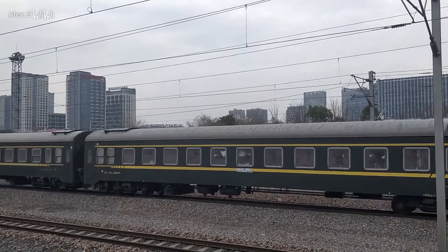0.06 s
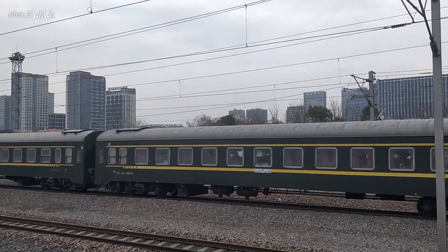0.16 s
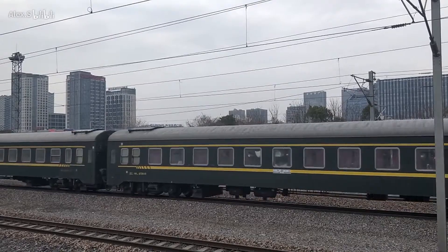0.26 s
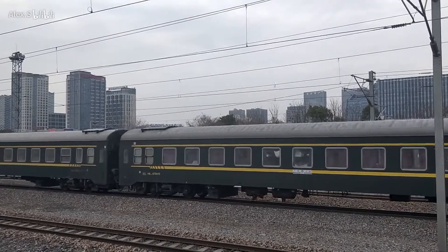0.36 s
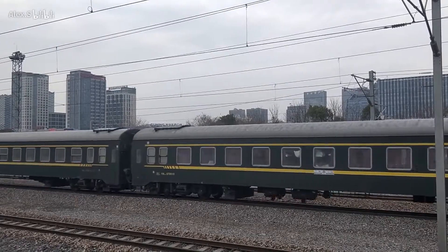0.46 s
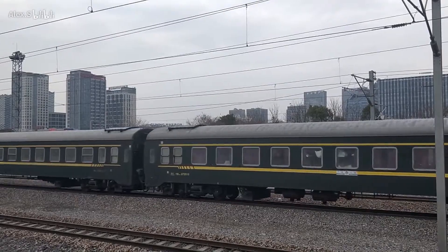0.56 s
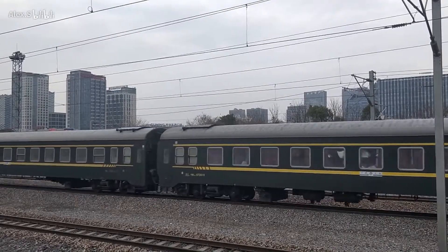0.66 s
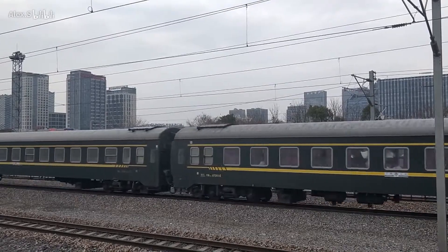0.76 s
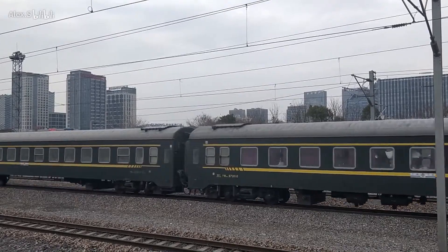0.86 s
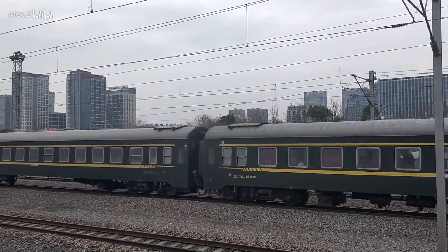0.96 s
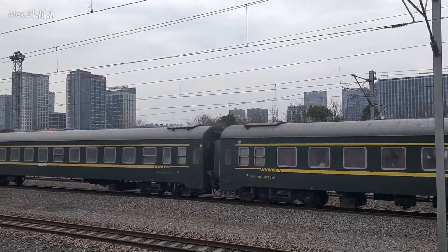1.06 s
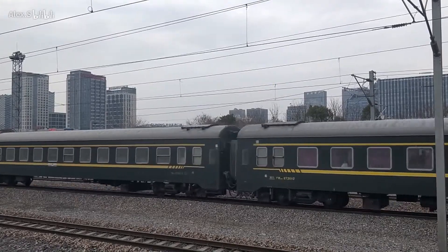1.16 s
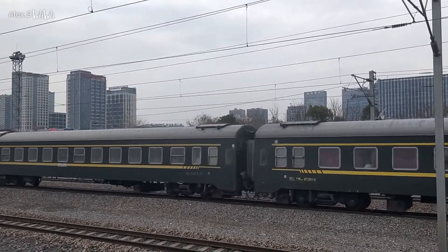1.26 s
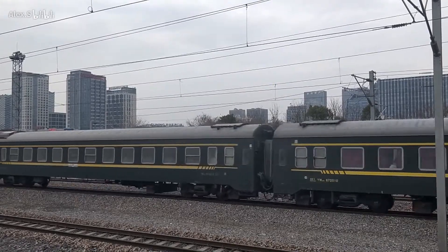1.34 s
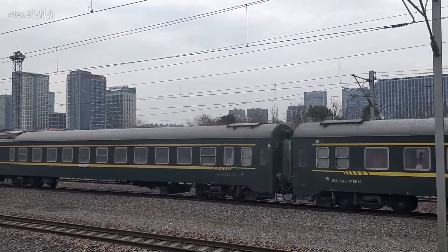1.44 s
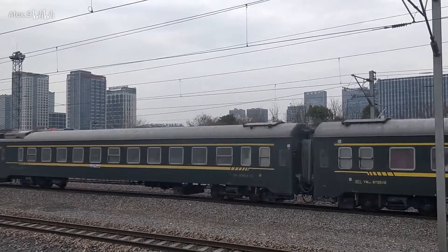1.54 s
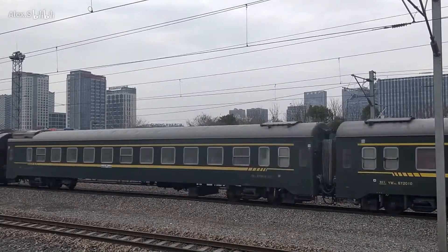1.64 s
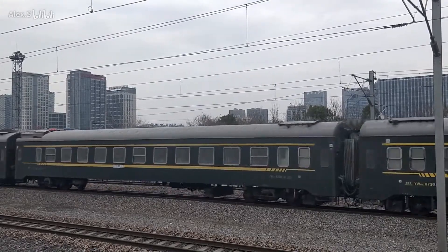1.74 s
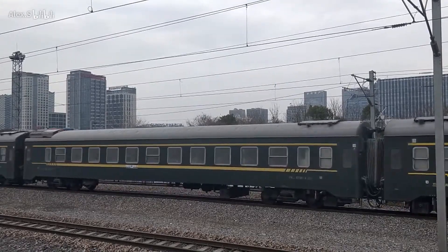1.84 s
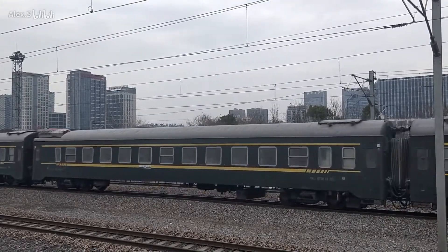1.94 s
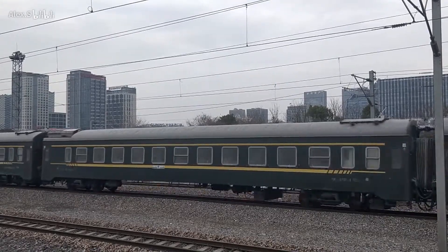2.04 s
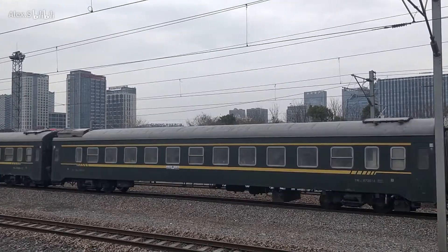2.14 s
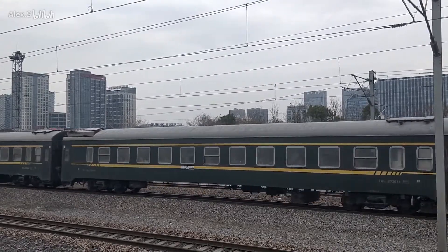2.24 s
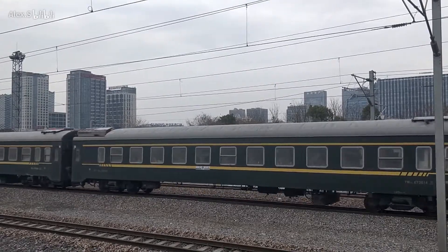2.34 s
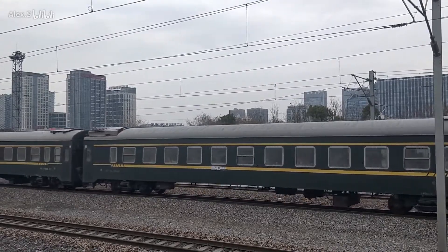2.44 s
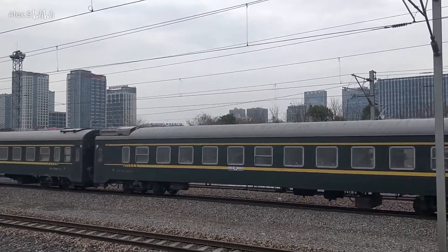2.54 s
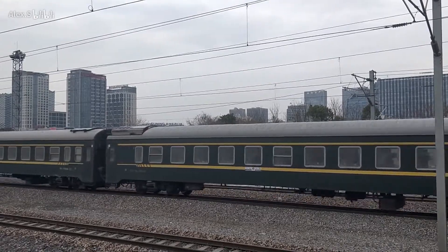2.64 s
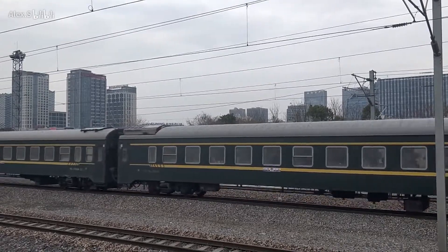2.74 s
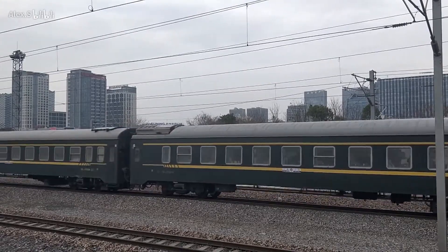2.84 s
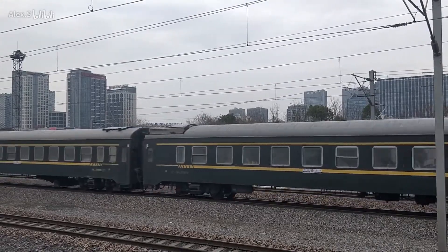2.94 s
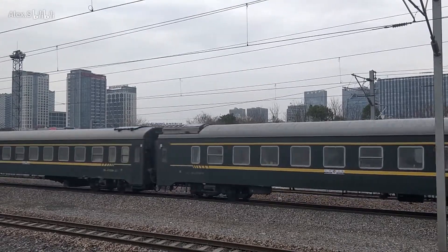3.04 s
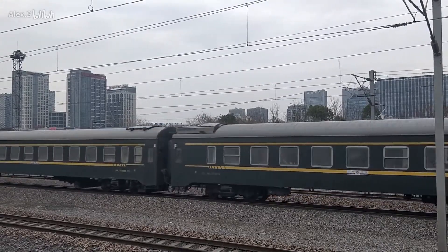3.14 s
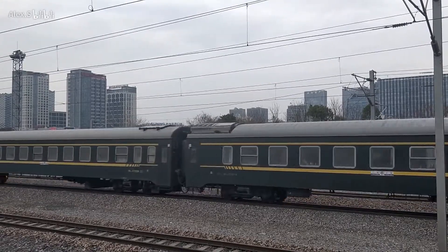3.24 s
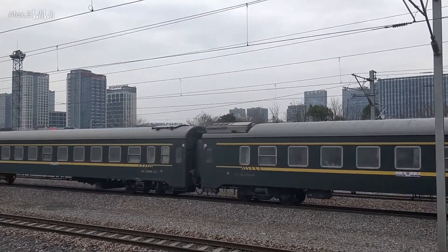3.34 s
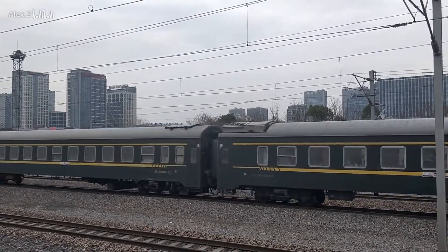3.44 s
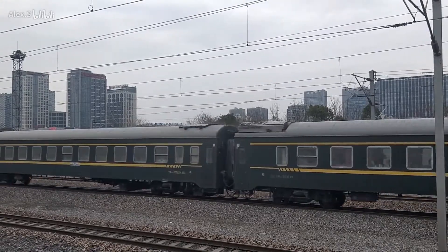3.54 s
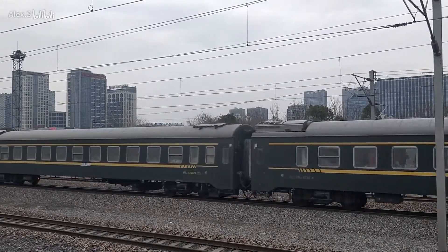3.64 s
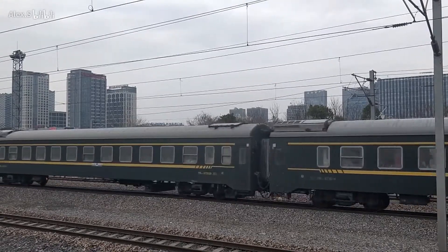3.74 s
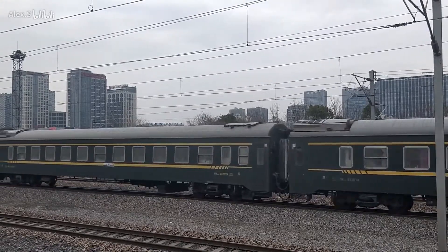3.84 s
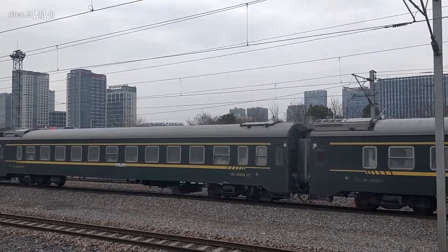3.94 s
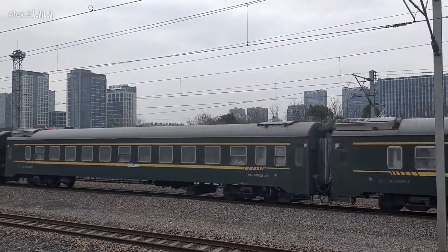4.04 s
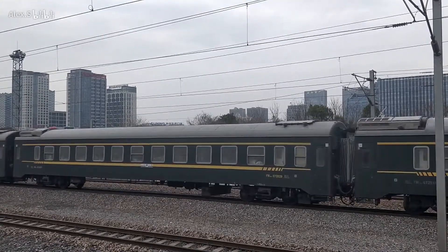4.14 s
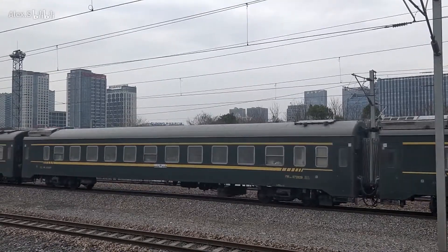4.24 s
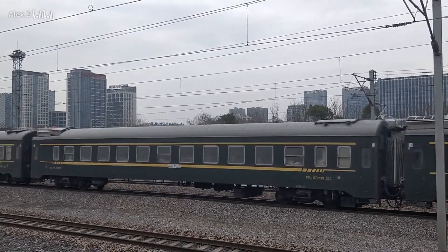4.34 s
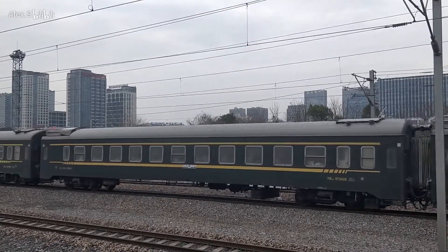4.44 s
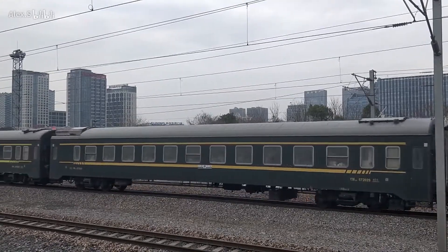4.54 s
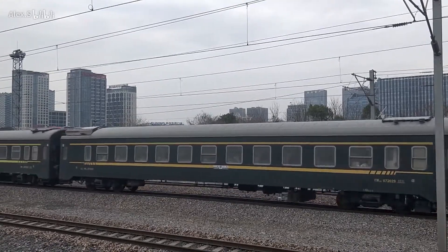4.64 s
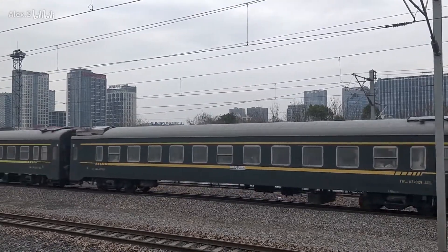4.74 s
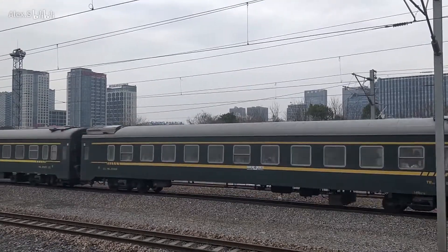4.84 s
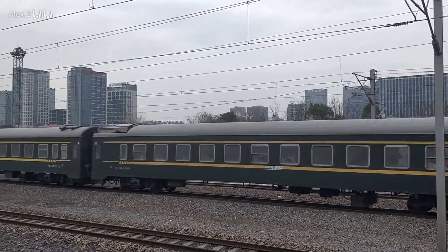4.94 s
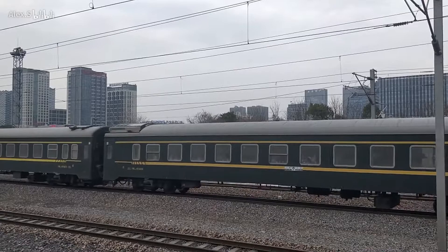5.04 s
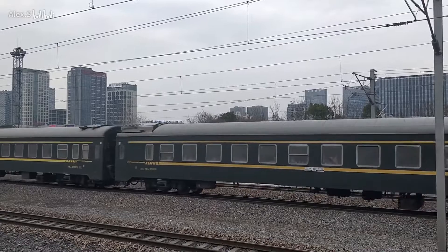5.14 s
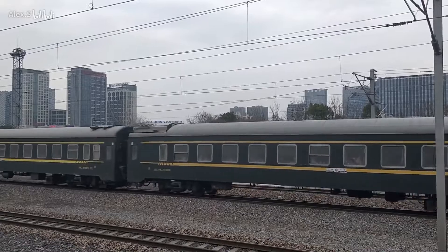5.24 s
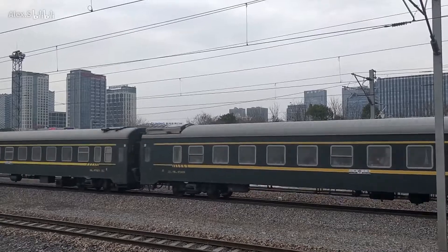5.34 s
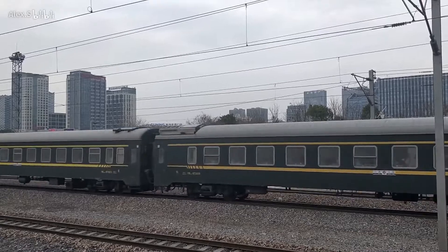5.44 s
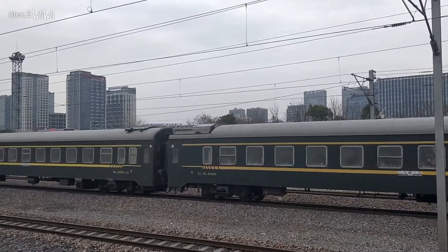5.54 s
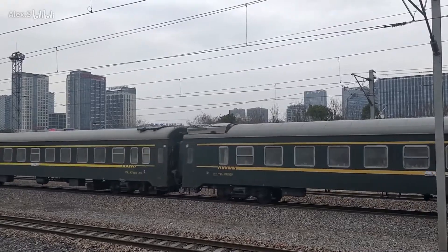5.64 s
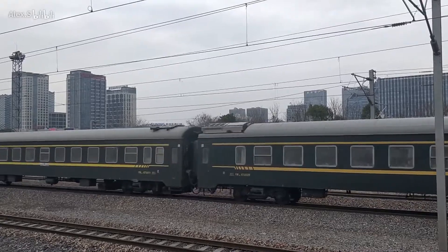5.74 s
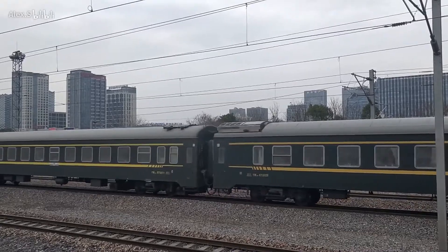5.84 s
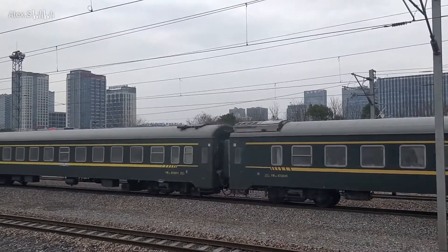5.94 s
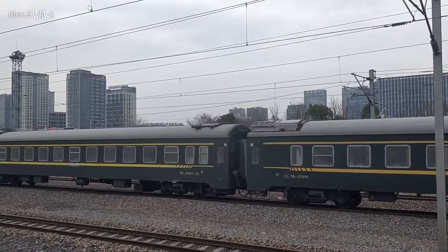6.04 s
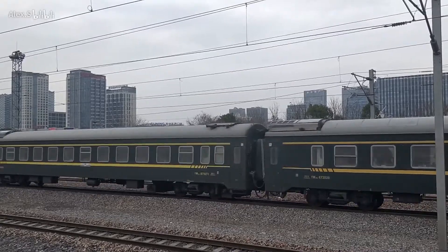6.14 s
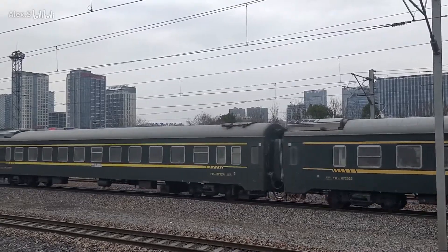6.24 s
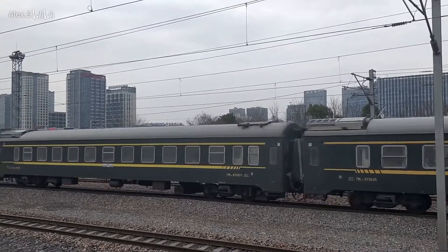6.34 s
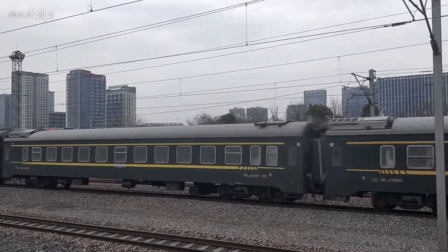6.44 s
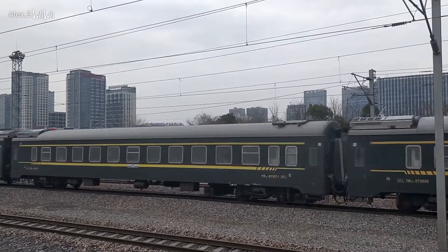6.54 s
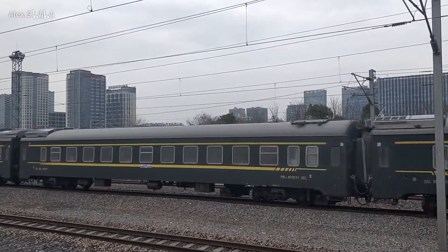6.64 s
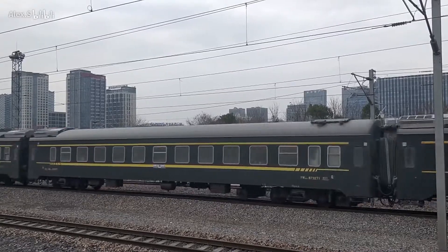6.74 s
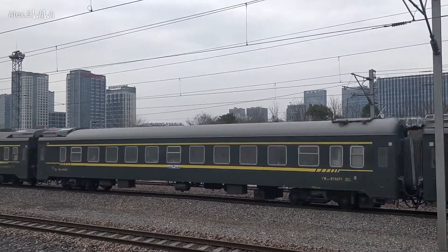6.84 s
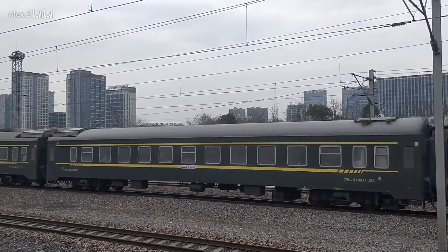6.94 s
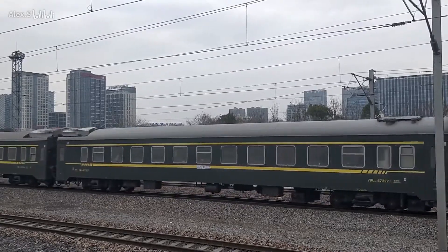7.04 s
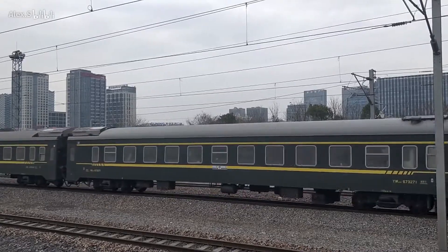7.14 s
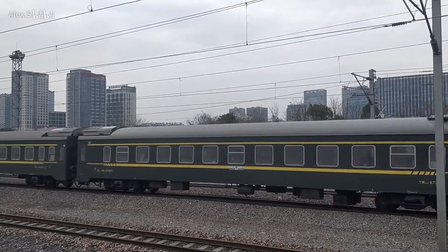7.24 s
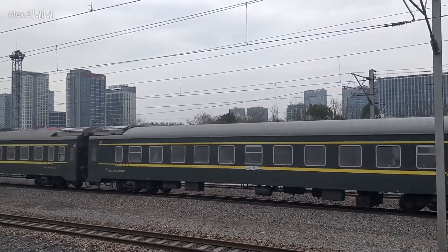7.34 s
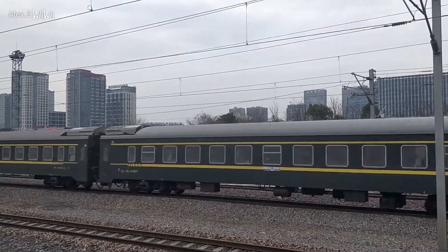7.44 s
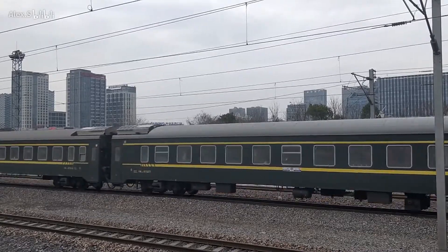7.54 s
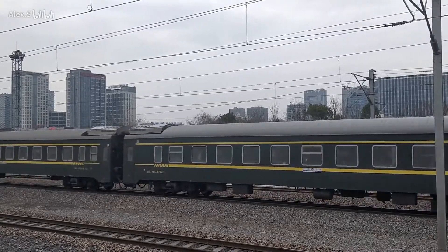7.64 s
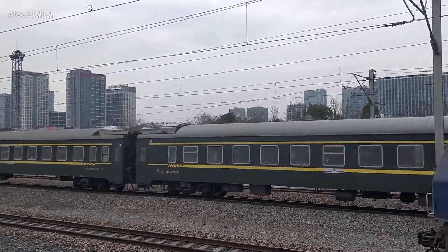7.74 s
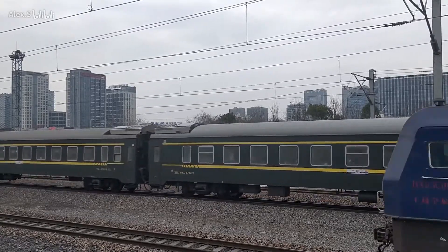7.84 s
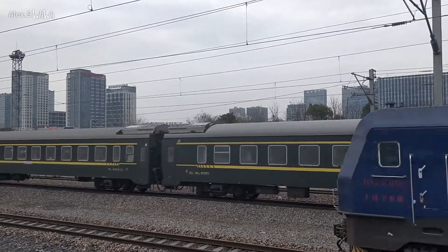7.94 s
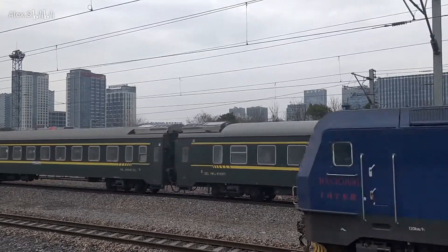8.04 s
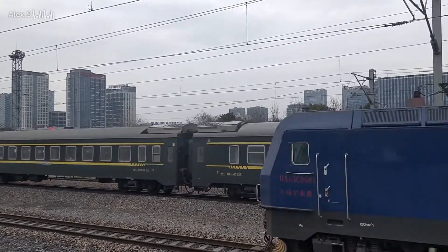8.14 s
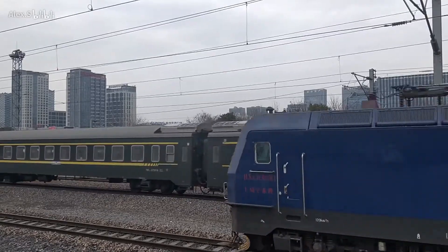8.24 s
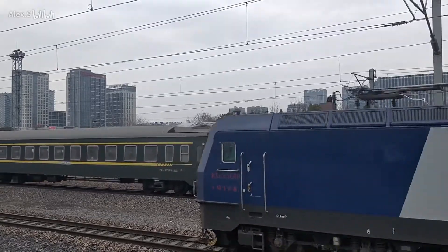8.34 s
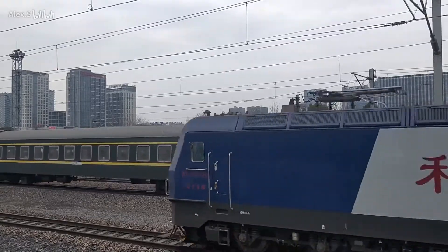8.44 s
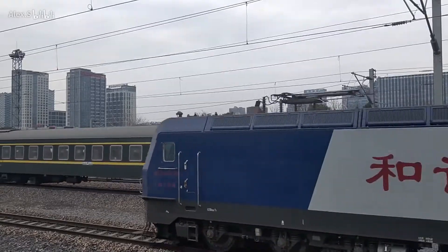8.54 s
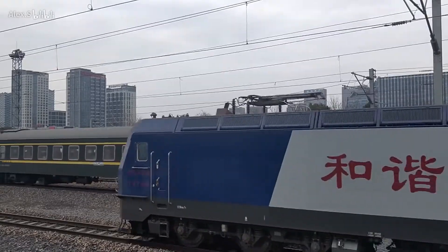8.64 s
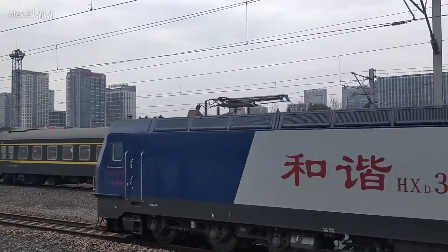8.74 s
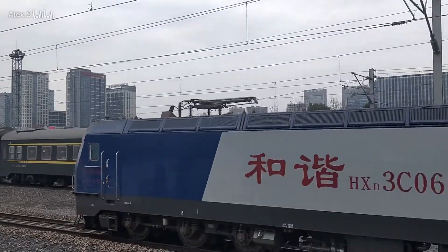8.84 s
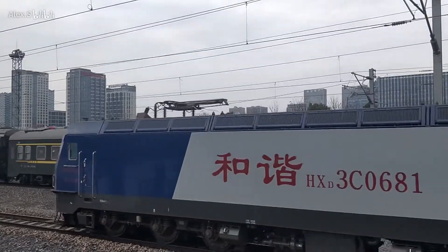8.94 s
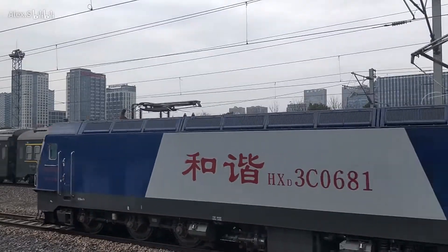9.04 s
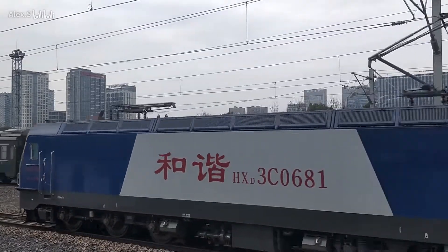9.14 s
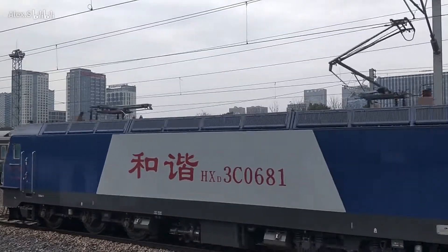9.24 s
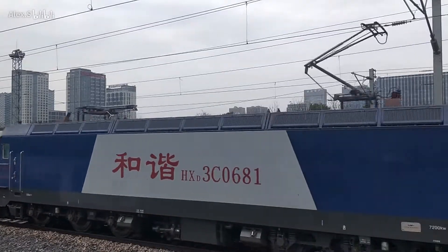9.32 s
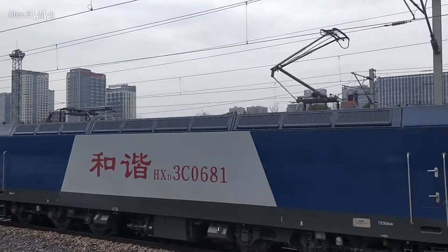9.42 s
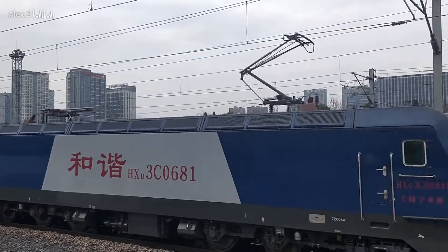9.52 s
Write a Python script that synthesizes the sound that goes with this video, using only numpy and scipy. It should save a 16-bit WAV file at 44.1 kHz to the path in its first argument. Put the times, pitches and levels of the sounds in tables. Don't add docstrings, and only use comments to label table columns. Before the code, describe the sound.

Passenger coaches roll past with a steady broadband roar while an electric locomotive approaches on the nearer track, its fan roar and wavering blower whine swelling.

```python
import sys
import numpy as np
from scipy import signal
from scipy.fft import rfft, irfft, dct, next_fast_len
from scipy.io import wavfile
from scipy.ndimage import uniform_filter1d

SR = 44100
rng = np.random.default_rng(int(sys.argv[2]) if len(sys.argv) > 2 else 0)


def inscribe(sig):
    pcm = np.round(np.clip(np.atleast_2d(sig).T, -1, 1) * 32767)
    wavfile.write(sys.argv[1], SR, pcm.astype(np.int16))


N = 422456
T = np.arange(N) / SR
SIZE = next_fast_len(N + 2)
HZ = np.maximum(np.arange(SIZE // 2 + 1) * SR / SIZE, 1)


def undb(db):
    return 10 ** (np.asarray(db) / 20)


def curves(table):
    s, *columns = np.transpose(table)
    return [np.interp(T, s, column) for column in columns]


def over_hz(table):
    hz, value = np.transpose(table)
    return np.interp(np.log(HZ), np.log(np.maximum(hz, 1)), value)


def wave(spectra):
    return irfft(spectra, SIZE)[..., :N]


def unit(x):
    return x / np.sqrt(np.mean(x.mean(axis=0) ** 2))


def walk(rate):
    hold = int(SR / rate)
    held = np.repeat(rng.standard_normal(N // hold + 1), hold)
    return 1.343 * uniform_filter1d(uniform_filter1d(held, hold), hold)[:N]


def plateaus(start, length, height, edge):
    t = T[::128, None]
    rises = np.tanh((t - start) / edge)
    falls = np.tanh((t - start - length) / edge)
    return np.interp(T, t[:, 0], ((rises - falls) / 2 * height).sum(axis=1))


def slide(x, ratio):
    at = np.cumsum(ratio) % (N - 1)
    return np.array([np.interp(at, np.arange(N), channel) for channel in x])


def roar(colour, rings, alike, lag_ms):
    # [f/Hz, left minus right/dB]
    port_tilt = [(30, 1.5), (200, 2.5), (340, 1), (600, 1.6), (1050, -0.5), (1870, -2), (2600, -6.5),
                 (3500, 1), (5900, -3.5), (8000, -4)]
    db = over_hz(colour)
    for hz, width, ring_db in rings:
        db = db + ring_db / (1 + (2 * (HZ - hz) / width) ** 4)
    mid, side = rfft(rng.standard_normal((2, SIZE)))
    likeness = np.clip(over_hz(alike), 0, 1)
    pair = np.sqrt(1 + likeness) * mid + np.sqrt(1 - likeness) * side * np.array([[1], [-1]])
    pair[0] *= np.exp(-2j * np.pi * HZ * lag_ms / 1000)
    return pair * undb(db + over_hz(port_tilt) * np.array([[.5], [-.5]]))


def bands(spectra):
    crossovers = [105, 700, 2400]
    above = [np.ones_like(HZ)]
    above += [1 / (1 + (hz / HZ) ** 10) for hz in crossovers]
    above += [0 * HZ]
    return [unit(wave(spectra * np.sqrt(np.abs(a - b)))) for a, b in zip(above, above[1:])]


def coaches():
    # [f/Hz, level/dB per Hz]
    coach_colour = [(21, -44.5), (35, -12), (96, -5), (134, -8.5), (157, -2.5), (291, -5.5), (339, -6),
                    (379, -7), (819, -11), (1620, -7.5), (2210, -21), (4190, -24.5), (6800, -34),
                    (8840, -64.5), (15000, -120)]
    # [f/Hz, width/Hz, level over the roar/dB]
    wheel_rings = [(162.2, 10, 4.5), (1541, 53, 5.5), (1664, 85, 4.5), (2043, 160, 8.5), (2517, 48, 7.5),
                   (2747, 66, 5), (3234, 37, 6.5), (3505, 54, 7.5), (4076, 190, 6.5), (4480, 300, 4),
                   (4740, 210, 5.5), (5080, 100, -4), (5460, 530, 5), (6376, 300, 4.5)]
    # [f/Hz, likeness/0-1]
    coach_alike = [(30, 0.7), (70, 0.99), (250, 1), (500, 1), (800, 0.08), (1250, 0.74), (1600, 0.37),
                   (1900, 0.8), (2500, 0), (5000, 0.3)]
    range_levels = [-42.5, -32, -35, -39]
    shade_levels = [-2.5, 2.5, -9, 0.5]
    ranges = bands(roar(coach_colour, wheel_rings, coach_alike, lag_ms=0.394))
    wheelsets = 1 + .012 * walk(5)
    shade = plateaus(7.06, T[-1], 1, edge=1)
    return [undb(db + shade_db * shade) * slide(x, wheelsets)
            for x, db, shade_db in zip(ranges, range_levels, shade_levels)]


def locomotive(loss_db, hz):
    # [f/Hz, level/dB per Hz]
    loco_colour = [(21, -50), (35, -22.5), (86, -26.5), (212, 0.5), (318, -1), (522, -2.5), (683, -11.5),
                   (895, -5.5), (1100, -9.5), (1800, -8.5), (2760, -33), (4840, -31.5), (7600, -52.5),
                   (9880, -88), (16700, -120)]
    # [f/Hz, width/Hz, level over the roar/dB]
    duct_rings = [(74.3, 14, 11.5), (277, 51, 0.5), (413.4, 9.1, 2.5), (1273, 54, 6.5), (1435, 39, 8),
                  (1762, 47, 5.5), (1876, 80, 4.5), (2108, 53, 5), (5100, 930, 3)]
    # [f/Hz, likeness/0-1]
    loco_alike = [(30, 1), (70, 0.97), (250, 0.92), (600, 0.76), (1000, .7), (1400, 0.64), (1800, 0.083),
                  (5000, 0.05)]
    range_levels = [-37.5, -19.5, -28, -27]
    loss_shares = [.25, .63, 1.05, 1.2]
    ranges = bands(roar(loco_colour, duct_rings, loco_alike, lag_ms=.27))
    doppler = hz / np.interp(8.9, T, hz)
    return [undb(db + share * loss_db) * slide(x, doppler)
            for x, db, share in zip(ranges, range_levels, loss_shares)]


def trains(loss_db, hz):
    # [t/s, length/s, rumble rise/dB]
    bogie_passes = [
        (0.102, .2, 1),
        (1.0, .7, 2),
        (1.9, 0.1, 4.5),
        (3.05, 0.28, 2.5),
        (4.1, 0.34, 4.5),
        (4.58, .2, 5.5),
        (5.18, 0.34, 4),
        (6.163, .14, 7),
        (9.246, 0.11, 2),
    ]
    ground_db = plateaus(*np.transpose(bogie_passes), edge=.05)
    out = 0
    for k, (far, near) in enumerate(zip(coaches(), locomotive(loss_db, hz))):
        out = out + undb((k == 0) * ground_db + .6 * walk(14)) * (far + near)
    return out


def air(loss_db):
    # [t/s, length/s, upper hiss rise/dB,
    # top hiss rise/dB]
    hiss_rows = [(.1, 0.11, 0, 11.5), (0.304, 0.11, 3, 11.5), (0.64, 1, -2, 10.5), (1.138, 0.082, 5, 4),
                 (1.36, 0.055, 5.5, 5.5), (1.686, 0.91, -1, 10), (1.9, 0.055, 8, 7.5),
                 (2.122, 0.09, 4.5, 8), (3.148, 1.17, 0.5, 10.5), (3.534, 0.078, 4.5, 3.5),
                 (3.763, 0.076, 2, 5.5), (4.456, 0.32, 5, 11), (4.952, .13, 1, 10),
                 (5.243, 0.14, 3.5, 11.5), (5.943, .08, 3, 17.5), (6.117, .26, 1.5, 12.5),
                 (6.744, 0.11, 4.5, 11), (6.948, 0.071, 6, 14), (7.057, 0.62, 3, -1), (7.65, 0.5, 2.5, 0),
                 (8.302, .25, 2.5, 11), (8.65, 0.063, 6, 19.5), (8.927, 0.2, 4.5, 14.5),
                 (9.191, 0.19, 4.5, 11.5), (9.499, .2, 5, 12.5)]
    start, length, upper_rise, top_rise = np.transpose(hiss_rows)
    upper_db = plateaus(start, length, upper_rise, edge=0.011)
    top_db = plateaus(start, length, top_rise, edge=0.011)
    noise = rfft(rng.standard_normal((3, SIZE)))
    upper = unit(wave(noise[:2] / (1 + ((HZ - 7300) / 900) ** 2)))
    top_colour = 1 / (1 + ((HZ - 10300) / 500) ** 2) + .55 / (1 + ((HZ - 9200) / 800) ** 2)
    top = unit(wave(noise[2:] * top_colour))
    upper *= undb(np.array([[-53.], [-54.5]]) + 0.33 * loss_db + 1.2 * upper_db + 1.4 * walk(11))
    top_db = top_db + .1 * loss_db + 1.6 * walk(25)
    return upper + top * undb(np.array([[-63.], [-95.]]) + top_db)


def knock():
    # [t/s, peak level/dB, f/Hz]
    stone = [
        (.352, -17, 1250),
    ]
    s, db, hz = stone[0]
    age = np.maximum(T - s, 0)
    ring = undb(db + 2.7) * np.exp(-age / .0026) * np.sin(2 * np.pi * hz * age)
    return np.array([ring, ring])


def tone(hz, waver):
    front = np.sin(2 * np.pi * np.cumsum(hz * (1 + waver * walk(14))) / SR)
    rear_hz = hz + .5 * (hz[0] - hz)
    rear = np.sin(2 * np.pi * np.cumsum(rear_hz * (1 + 1.51 * waver * walk(20))) / SR)
    return np.sqrt(2) * (front + undb(-10.5) * rear)


def swelling(rows):
    start, length, db = np.transpose(rows)
    flutter_db = 1.9 * walk(14)
    return plateaus(start, length, undb(db), edge=.03) * undb(flutter_db)


def lag_left(x, lag_ms):
    return np.array([np.interp(T - lag_ms / 1000, T, x[0]), x[1]])


def blowers(loss_db, hz, lag_ms):
    # [t/s, length/s, level/dB], four tables
    low = [
        (3.45, .85, -30),
        (4.6, .32, -28),
        (4.95, .33, -32),
        (5.4, .35, -30),
        (5.8, .4, -35),
        (6.35, .85, -25),
        (7.42, .42, -21),
        (7.95, .28, -26),
        (8.3, .7, -21),
        (9.12, .5, -31),
    ]
    second = [
        (3.0, .3, -38),
        (3.55, .4, -37),
        (6.1, .55, -28),
        (6.7, .55, -31),
        (7.33, .3, -29),
        (7.72, .5, -29),
        (8.25, .45, -29),
        (8.75, .5, -23),
        (9.3, .3, -27),
    ]
    third = [
        (4.0, .3, -35),
        (4.6, 1.1, -37),
        (5.8, .4, -34),
        (6.83, .35, -28),
        (7.23, .28, -23),
        (7.72, .5, -25),
        (8.52, .23, -23),
        (8.92, .33, -22),
        (9.32, .3, -31),
    ]
    highest = [
        (5.2, .6, -38),
        (6.2, .8, -40),
        (7.25, .25, -35),
        (7.6, .25, -33),
        (7.9, .25, -31),
        (8.22, .42, -28),
        (8.95, .35, -31),
        (9.33, .3, -33),
    ]
    ratios = [.2545, .409, .590, 1]
    wavers = [0.0037, 0.00759, 0.00344, 0.00393]
    trims = [-1.5, -1.5, -1, 2.5]
    between_levels = [-41, -35.5, -35.5, -44.5]
    # [t/s, length/s, hum level/dB]
    compressor_runs = [
        (5.9, 0.56, -32),
        (6.65, 1.13, -32.5),
        (8.0, .33, -28.5),
        (8.42, 0.36, -31),
        (9.05, 0.42, -35.5),
    ]
    gains = []
    for rows, trim_db, db in zip([low, second, third, highest], trims, between_levels):
        swell = undb(trim_db) * swelling(rows)
        between = undb(db + 0.53 * loss_db + 4.9 * walk(6))
        gains.append(np.hypot(swell, between))
    out = sum(gain * tone(ratio * hz, waver) for gain, ratio, waver in zip(gains, ratios, wavers))
    out += gains[3] * undb(-7.5 + 5.9 * walk(3.1)) * tone(2 * hz, .004)
    out += swelling(compressor_runs) * tone(.1515 * hz, 0.0022)
    return lag_left(out * undb([[.7], [-.7]]), lag_ms)


def side_fan():
    # [t/s, f/Hz, level/dB]
    grille = [
        (8.75, 450, -47),
        (8.95, 445.4, -24.5),
        (9.2, 435.4, -21),
        (9.4, 423.4, -28.5),
        (9.58, 415.4, -21.5),
    ]
    hz, db = curves(grille)
    return undb(db + 1.3 * walk(13)) * np.sin(2 * np.pi * np.cumsum(hz * (1 + 0.01197 * walk(22))) / SR)


def scene():
    # [t/s, level lost to distance/dB, top blower tone f/Hz, left port lag/ms]
    approach = [(0, -25.5, 926, 0.26), (3, -18.5, 928.7, 0.15), (4, -15, 924.6, 0.42),
                (5, -13.5, 918.3, 0.3), (6, -9, 920.5, 0.43), (6.6, -9.5, 917, 0.34),
                (7, -7.5, 913.6, 0.38), (7.5, -5.5, 911.2, 0.29), (8, -3.5, 904.8, 0.29),
                (8.5, -1, 896, 0.26), (9, -0.5, 887.7, 0.1), (9.58, -0.5, 887, 0.067)]
    loss_db, hz, lag_ms = curves(approach)
    return trains(loss_db, hz) + air(loss_db) + knock() + blowers(loss_db, hz, lag_ms) + side_fan()


def coarse(x, grid, finer_db, follow=.48):
    # [f/Hz, step/dB]
    step_table = [(2500, -41), (3800, -33.5), (5000, -30), (5700, -28.5), (8000, -29.5), (11000, -29.5)]
    frame = 1024
    kaiser = np.cumsum(np.kaiser(frame + 1, 4 * np.pi))
    rise = np.sqrt(kaiser[:-1] / kaiser[-1])
    half, lead = frame // 2, 2 * frame - grid
    pad = np.pad(x, ((0, 0), (lead, 3 * frame)), mode="reflect")
    seams = pad[:, :pad.shape[1] // frame * frame].reshape(2, -1, frame)
    a, b = seams[..., half - 1::-1], seams[..., half:]
    up, down = rise[half:], rise[half - 1::-1]
    head, tail = up * b - down * a, up * a + down * b
    c = dct(np.concatenate([tail[:, 1:], head[:, :-1, ::-1]], axis=2), type=4, norm="ortho")
    hz, step_db = np.transpose(step_table)
    frame_db = 10 * np.log10(np.mean(c ** 2, axis=(0, 2)) + 1e-9)
    loud_db = uniform_filter1d(frame_db, size=9) + 22
    line_db = np.interp(np.arange(frame) * SR / 2 / frame, hz, step_db)
    step = undb(line_db - finer_db + follow * loud_db[:, None])
    step = step * undb(1.8 * np.repeat(rng.standard_normal((len(step), frame // 16)), 16, axis=1))
    rounded = step * np.sign(c) * np.floor(np.abs(c) / step + .4)
    c = dct(rounded, type=4, norm="ortho")
    tail[:, 1:], head[:, :-1] = c[..., :half], c[..., :half - 1:-1]
    out = np.concatenate([(up * tail - down * head)[..., ::-1], up * head + down * tail], axis=2)
    return out.reshape(2, -1)[:, lead:lead + N]


def roll_off(x):
    return signal.sosfilt(signal.butter(12, 11050, fs=SR, output="sos"), x)


def record(dry):
    grid = 876
    left, right = rfft(np.tanh(dry * 1.117) / 0.86, SIZE)
    fold = np.exp(-((HZ - 5600) / 1500) ** 8) * (HZ > 4580)
    mid = (left + right) / 2
    side = (left - right) / 2 * undb(-14 * fold)
    stored = coarse(wave(np.array([mid + side, mid - side])), grid - 300, finer_db=0)
    stored = coarse(stored, grid, finer_db=25)
    return roll_off(stored)


dry = scene()
out = record(dry)
inscribe(out)
```